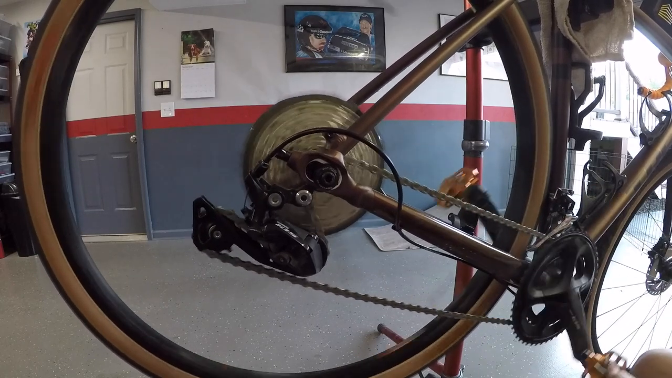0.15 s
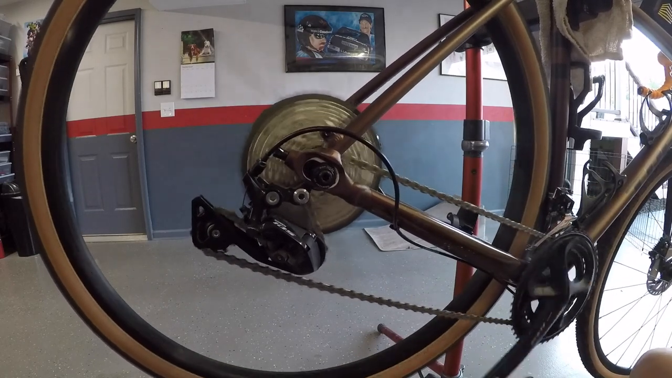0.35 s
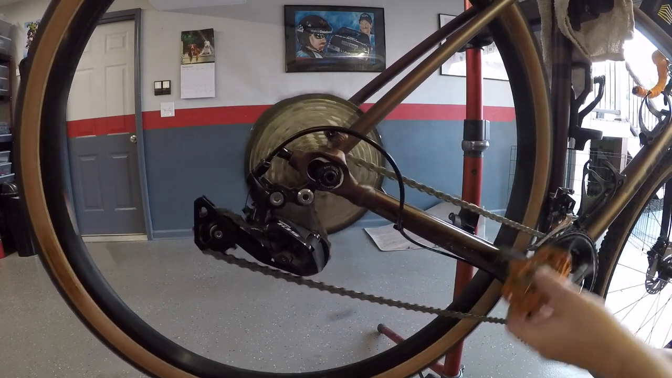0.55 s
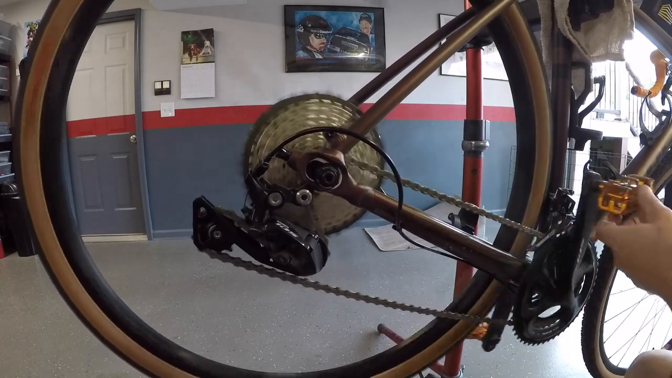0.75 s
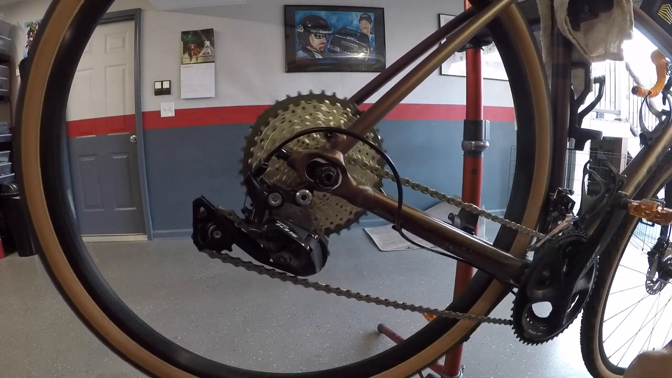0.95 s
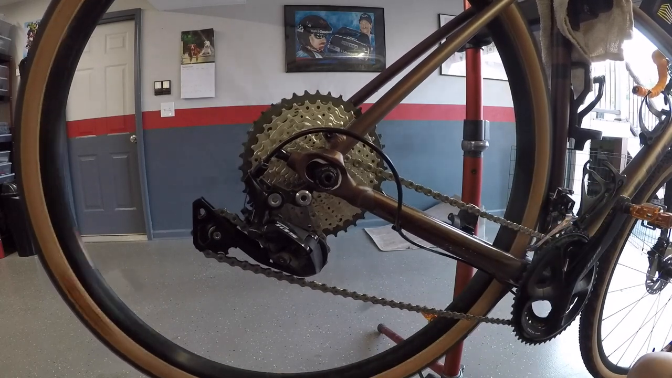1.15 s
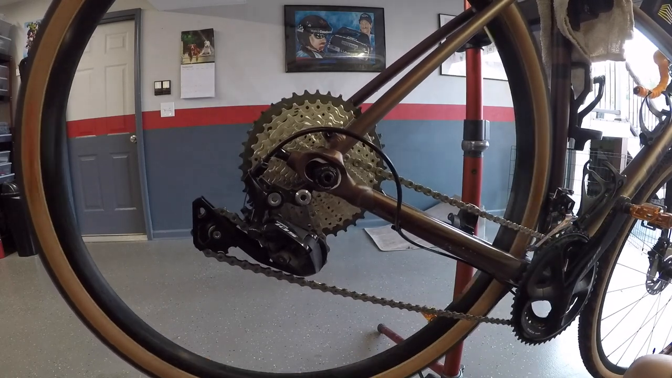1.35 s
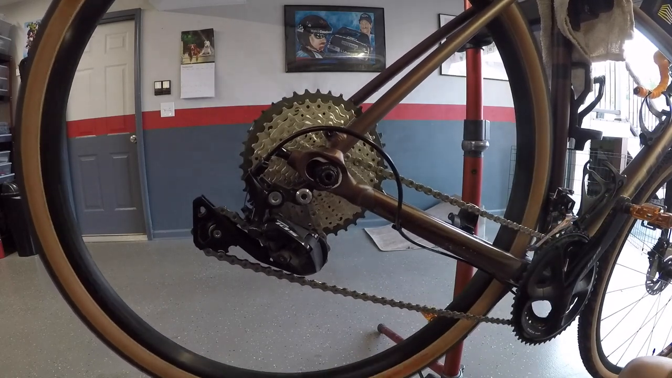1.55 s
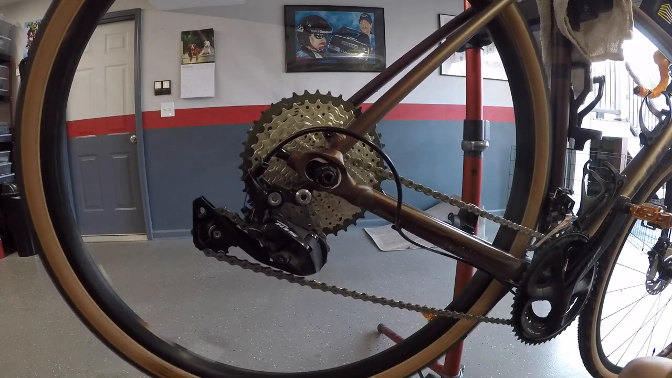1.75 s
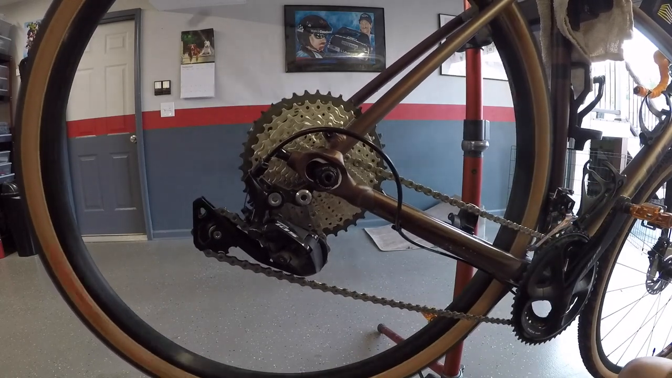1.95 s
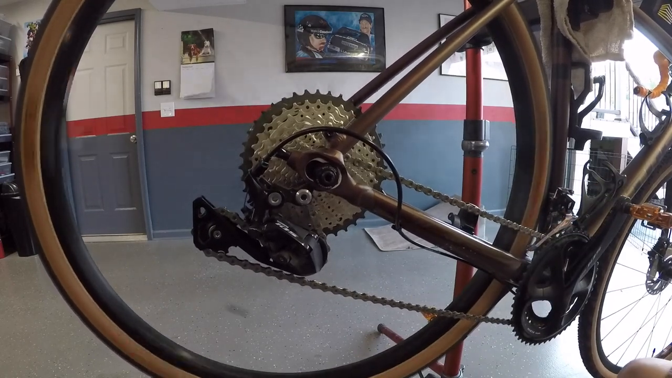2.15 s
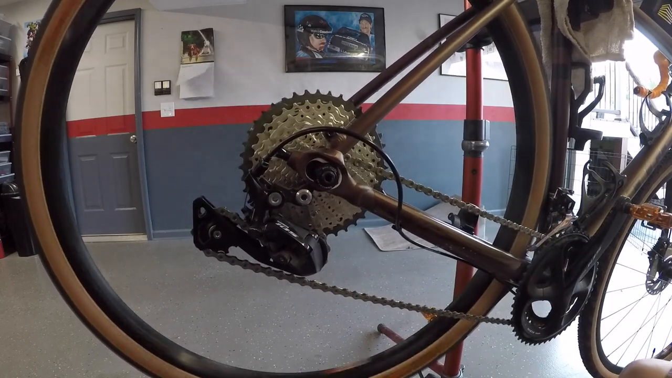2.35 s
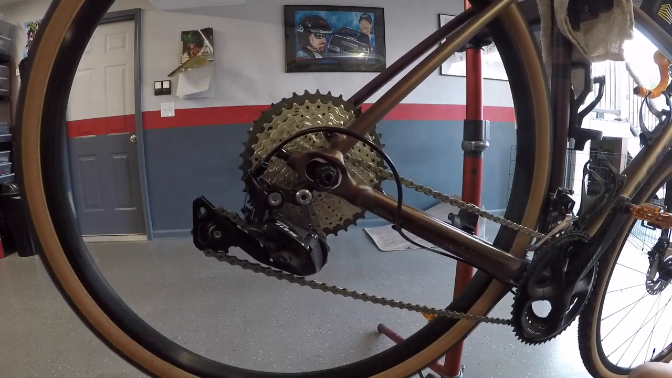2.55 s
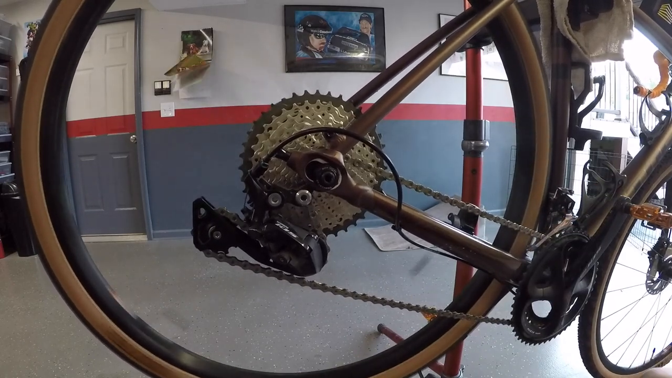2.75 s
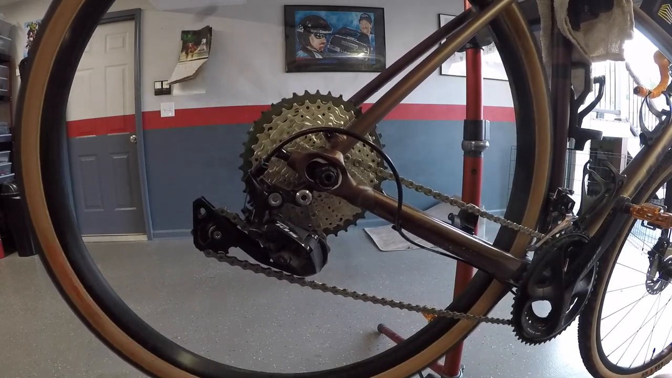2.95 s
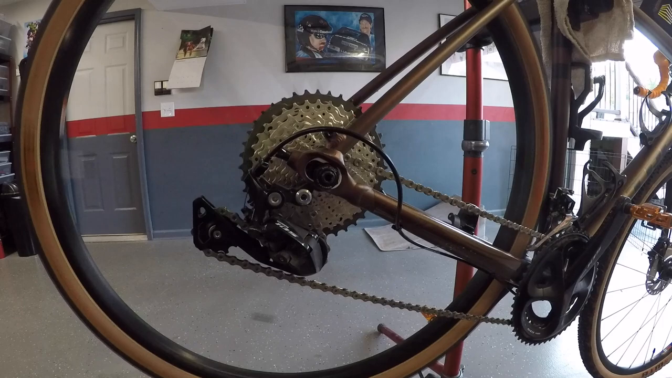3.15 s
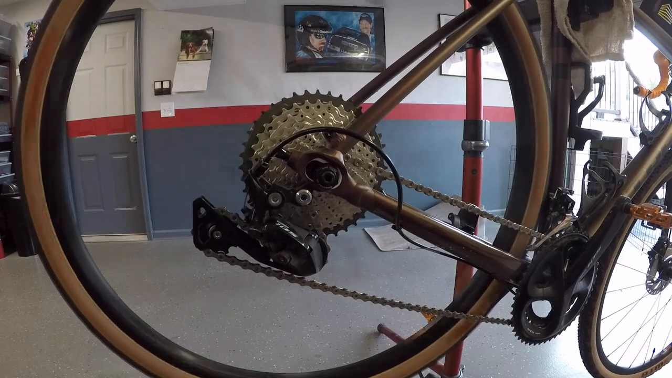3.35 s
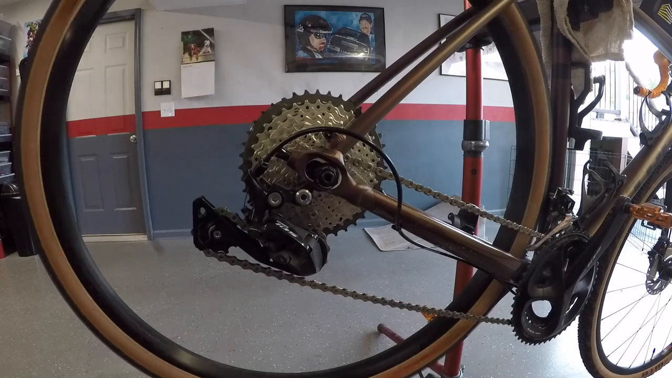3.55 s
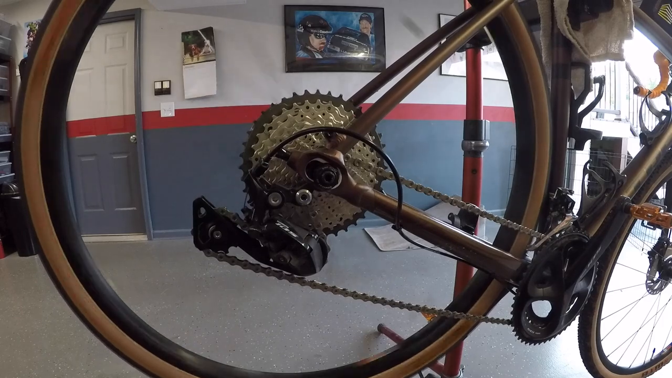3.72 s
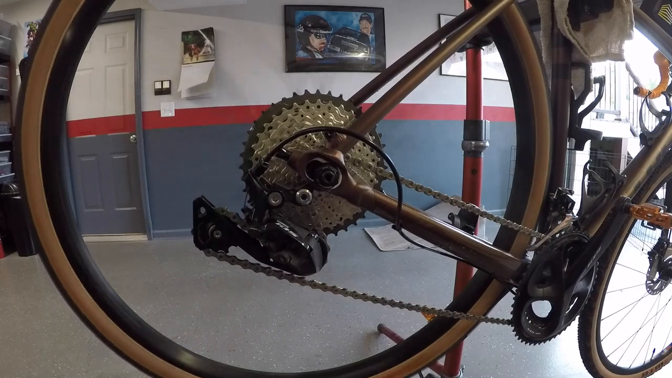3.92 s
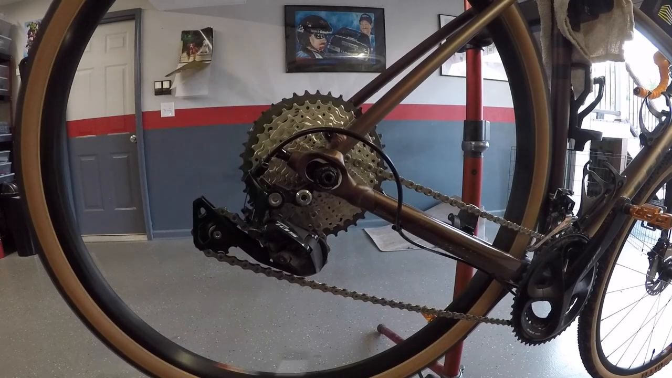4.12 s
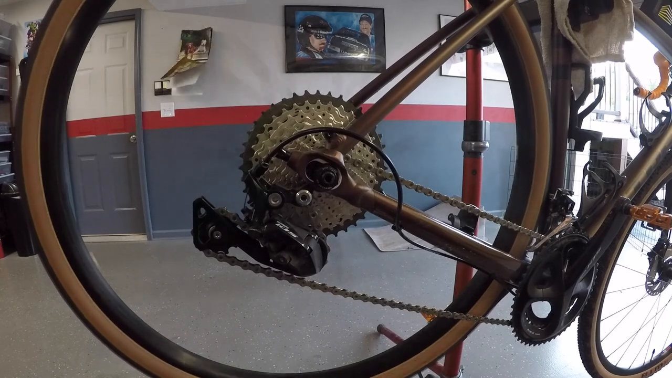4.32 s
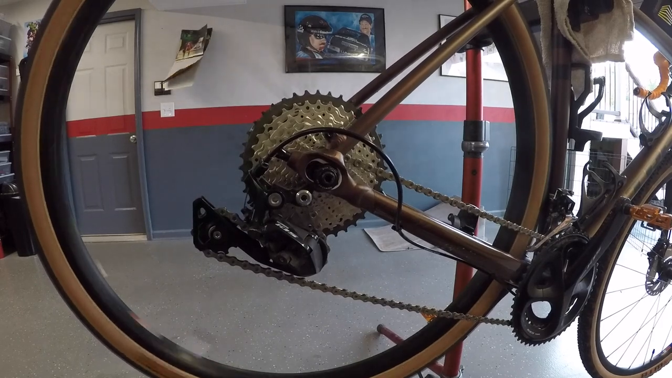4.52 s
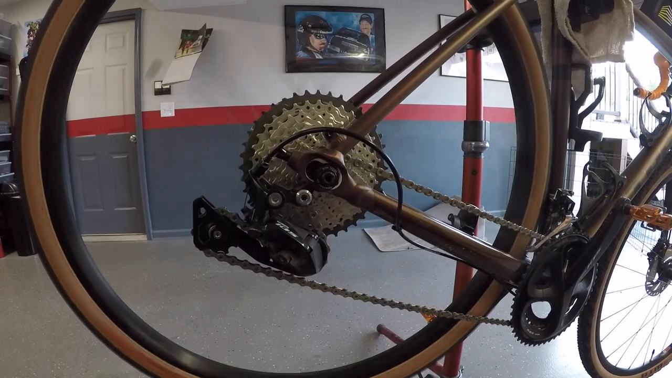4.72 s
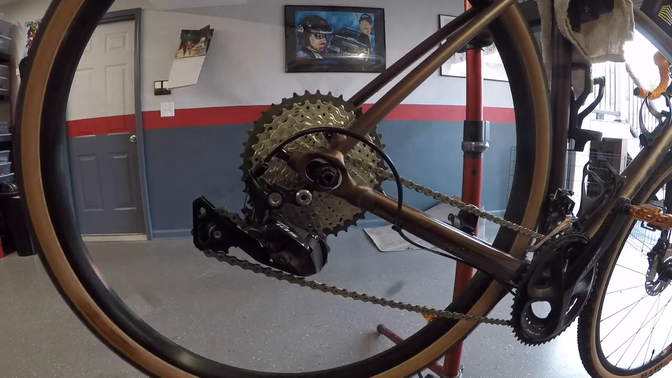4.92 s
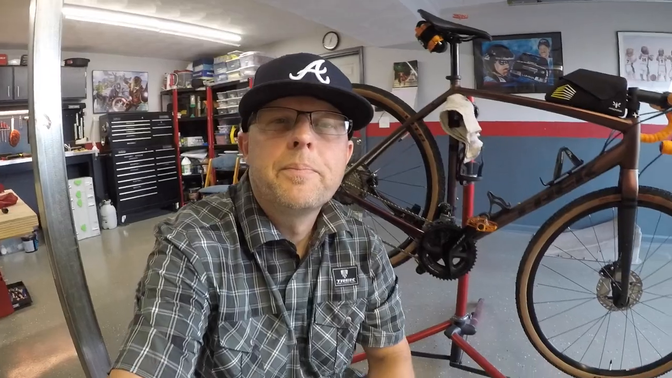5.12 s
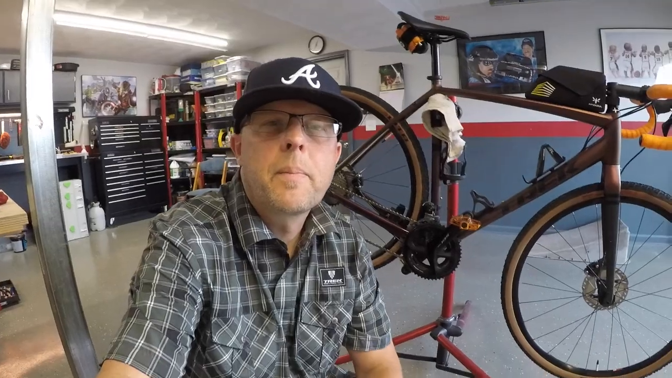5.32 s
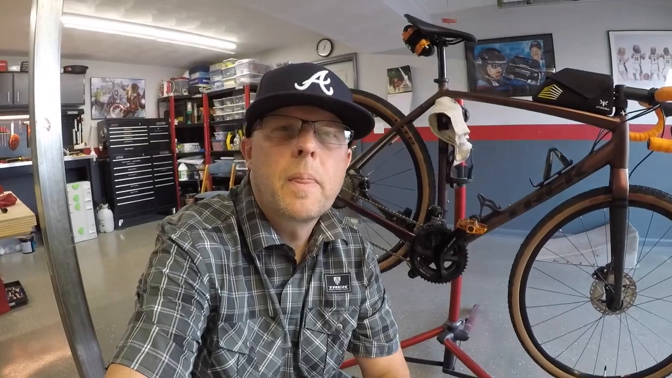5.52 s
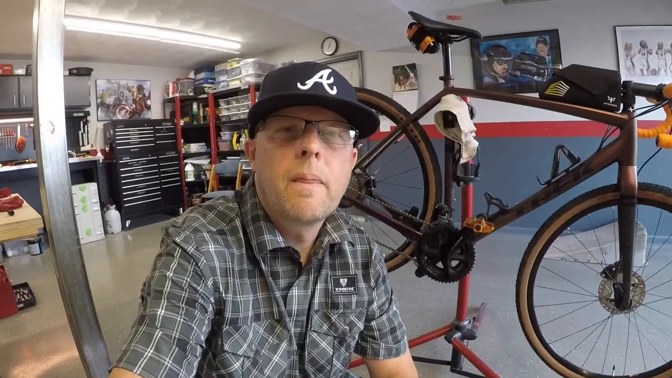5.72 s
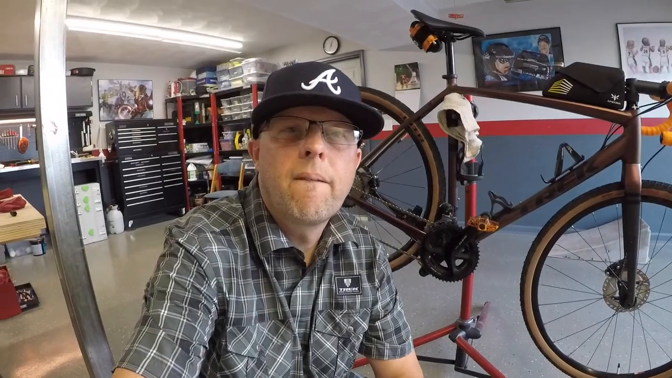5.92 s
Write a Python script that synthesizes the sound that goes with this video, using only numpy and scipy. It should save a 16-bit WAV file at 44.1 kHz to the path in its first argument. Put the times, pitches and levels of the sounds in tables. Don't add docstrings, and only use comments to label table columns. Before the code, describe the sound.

A loud ratcheting freehub buzz follows a short run of chain ticks in a garage, with low thumps, then sudden near silence.

```python
import sys
import numpy as np
from scipy import signal
from scipy.fft import rfft, irfft, next_fast_len
from scipy.io import wavfile
from scipy.ndimage import uniform_filter1d

SR = 44100
rng = np.random.default_rng(int(sys.argv[2]) if len(sys.argv) > 2 else 0)


def gain_from_decibels(decibels):
    exponent = np.asarray(decibels, float) / 20
    return 10 ** exponent


def materialize(psi):
    bounded = np.clip(np.atleast_2d(psi).T, -1, 1)
    quanta = np.round(bounded * 32767).astype(np.int16)
    wavfile.write(sys.argv[1], SR, quanta)


N = 263491
TIME = np.arange(N) / SR

RING_TEETH = 21
TOOTH_REPEAT = .7

# time in seconds, level in dB.
SPRING_FORCE = [(.67, -31.5), (.85, -33), (1.1, -32.5), (5, -32)]
# frequency in Hz, width in Hz, level in dB.
HUB_MODES = [(1920, 30, -6), (2230, 110, -4), (2630, 70, -5), (3140, 62, -4), (3450, 34, -2),
             (4160, 49, -4), (4580, 280, 0), (5600, 60, -2), (6280, 34, -8), (6450, 140, -9),
             (6720, 26, -10), (6900, 66, -10), (7800, 110, -13), (8060, 250, -7), (8650, 390, -8),
             (10000, 64, -4), (11000, 89, -2), (11400, 48, -5), (12200, 120, -6), (13400, 170, -5),
             (14400, 160, -6)]
# frequency in Hz, level in dB.
SPOKE_MODES = [(1916, -59.5), (2207, -59), (2439, -59), (3456, -55), (4177, -59), (4727, -55), (5599, -57),
               (6282, -62), (6724, -62), (7800, -66), (8064, -60), (8667, -62), (10002, -58), (11041, -57),
               (12258, -61), (13361, -59)]
# frequency in Hz, density in dB per Hz.
CRACK_COLOUR = [(470, -63), (800, -13), (1020, -31), (1120, -17), (1380, -17), (2220, -6.5), (2950, -3),
                (3640, -2.5), (4600, -1.5), (5020, -12.5), (5470, -9), (7350, -11.5), (8310, -7),
                (9290, -1), (11000, -9.5), (15200, -5)]
# frequency in Hz, width in Hz, level in dB.
PAWL_MODES = [(1690, 490, -14), (4740, 430, 3), (5420, 310, 4.5), (8930, 520, -8.5), (11080, 1300, 2.5),
              (12530, 1100, -1.5), (14300, 1090, -2)]
# frequency in Hz, width in Hz, depth from 0 to 1.
CANCEL_DIPS = [(8160, 110, 1), (9310, 460, 1), (12800, 540, 0.3)]
# delay in seconds, level in dB.
NEAR_ECHOES = [(.0035, -8), (.0085, -10), (.0147, -13)]
# frequency in Hz, density in dB per Hz.
RATTLE_COLOUR = [(180, -34), (300, -4), (354, 3), (431, -1), (995, -3.5), (1080, 1.5), (1480, -0.5),
                 (4220, -3), (7260, -11), (11500, -9.5), (15200, -22.5)]
# time in seconds, peak in dB, low metal share in dB.
LAST_LINKS = [
    (0.591, -33.5, -5),
    (0.602, -33, -16),
    (0.6313, -28.5, -18),
    (0.6674, -35.5, -20),
]
# time in seconds, peak in dB, ring in Hz, t60 in seconds, thud in dB.
KNOCKS = [
    (0.219, -37, 632, 0.045, -23),
    (0.721, -33.5, 1100, 0.063, -32),
    (3.167, -38, 195, 0.17, -9),
    (3.884, -34, 244, 0.1, 7),
    (3.997, -27, 242, 0.14, 4.5),
    (4.094, -36, 255, 0.12, -19),
    (4.145, -45.5, 249, 0.17, -9),
    (5.251, -48, 167, 0.093, -6),
]
# time in seconds, peak in dB, rise in seconds, fall in seconds.
HANDLING = [
    (3.22, -40, .1, .25),
    (3.65, -50, 0.072, .15),
    (3.9, -41.5, 0.47, 0.12),
    (4.009, -33.5, 0.16, 0.19),
    (4.25, -46.5, 0.11, 0.13),
    (4.62, -42.5, 0.38, 0.41),
    (5.0, -48, 0.42, .1),
    (5.11, -40.5, 0.058, 0.61),
]
# frequency in Hz, level in dB.
HUM_TONES = [(104, -70), (129.2, -70.5), (208.5, -67.5), (312.2, -82)]
# frequency in Hz, density in dB per Hz.
GARAGE_COLOUR = [(35, -46), (60, -5), (114, 8), (176, -9.5), (200, 0), (280, -4), (306, -4), (934, -11.5),
                 (1200, -10.5), (1560, -57), (2640, -120)]
# frequency in Hz, density in dB per Hz.
QUIET_COLOUR = [(47, -39), (80, -8), (114, -14), (145, -23), (510, -20), (1570, -21.5), (2180, -28.5),
                (4500, -32), (5600, -36.5), (15500, -44)]
# start in seconds, end in seconds, frequency in Hz, level in dB.
SQUEAK = (5.42, 5.54, 2980, -77)
# time in seconds, gain in dB.
FADE_OUT = [(4.99, 0), (5.007, -1), (5.0085, -46), (5.0255, -42), (5.027, -90)]
# time in seconds, gain in dB.
FADE_IN = [(5.05, -70), (5.056, -30), (5.064, -3), (5.075, 0)]
# frequency in Hz, gain in dB.
TOP_END = [(15250, 0), (15330, -11), (15820, -24), (15880, -75), (20000, -75)]


def curve(table):
    return np.interp(TIME, *np.transpose(table))


def noise():
    return rng.standard_normal(N)


def level(x, db):
    return x * gain_from_decibels(db) / np.sqrt(np.mean(x ** 2))


def shape(table, hz):
    points_hz, points_db = np.transpose(table)
    return np.interp(np.log(hz), np.log(points_hz), points_db)


def colour(x, table):
    size = next_fast_len(N)
    hz = np.arange(1, size // 2 + 2) * SR / size
    return irfft(rfft(x, size) * gain_from_decibels(shape(table, hz)), size)[:N]


def ring(x, hz, width_hz):
    r = np.exp(-np.pi * width_hz / SR)
    poles = [1, -2 * r * np.cos(2 * np.pi * hz / SR), r * r]
    return (1 - r * r) / 2 * signal.lfilter([1, 0, -1], poles, x)


def fade(x, t60):
    return signal.lfilter([1], [1, -np.exp(-np.log(1000) / (t60 * SR))], x)


def spikes(s, gain):
    return np.bincount(np.clip((s * SR).astype(int), 0, N - 1), gain, N)


def walk(rate):
    hold = int(SR / rate)
    steps = np.repeat(rng.standard_normal(N // hold + 1), hold)
    return 1.3 * uniform_filter1d(uniform_filter1d(steps, hold), hold)[:N]


def slipped_teeth():
    wheel_teeth_per_s = 71.838 * (1 - .05289 * TIME + .00094 * TIME ** 2)
    brake_start_s, cogs_stop_s = .5257, 1.0038
    cogs = np.clip((cogs_stop_s - TIME) / (cogs_stop_s - brake_start_s), 0, 1) ** .9595
    silent_teeth = 1.647
    return np.cumsum(wheel_teeth_per_s * (1 - cogs)) / SR - silent_teeth


def worn(tooth):
    lasting = rng.standard_normal(RING_TEETH)[tooth % RING_TEETH]
    passing = rng.standard_normal(len(tooth))
    return np.sqrt(TOOTH_REPEAT) * lasting + np.sqrt(1 - TOOTH_REPEAT) * passing


def pawl_drops(tooth):
    lag_s = .0007
    first = np.interp(tooth, slipped_teeth(), TIME) + .00015 * worn(tooth)
    second = first + lag_s * np.abs(worn(tooth))
    third = first + 2.5 * lag_s * np.abs(worn(tooth))
    share = gain_from_decibels(np.array([2 * worn(tooth), 2.5 * worn(tooth) - 4, 2.5 * worn(tooth) - 7]))
    spring = gain_from_decibels(np.interp(first, *np.transpose(SPRING_FORCE)))
    force = share / np.sqrt(np.sum(share ** 2, axis=0)) * spring
    return np.concatenate([first, second, third]), force


def freehub():
    tooth = np.arange(262)
    drops, force = pawl_drops(tooth)
    first = drops[:len(tooth)]
    last = np.clip(np.searchsorted(first, TIME) - 1, 0, None)
    since = (np.arange(N) - (first[last] * SR).astype(int)) % 2048
    fresh = noise()

    def chatter(t60, tail=0.):
        blows = spikes(drops, (force * gain_from_decibels(worn(tooth))).ravel())
        swell = fade(blows, t60)
        if tail:
            swell = swell + tail * fade(blows, 5 * t60)
        swell = signal.lfilter([.08], [1, -.92], swell)
        own = rng.standard_normal((RING_TEETH, 2048))[last % RING_TEETH, since]
        passing = np.roll(fresh, rng.integers(N))
        return swell * (np.sqrt(TOOTH_REPEAT) * own + np.sqrt(1 - TOOTH_REPEAT) * passing)

    hub = sum(gain_from_decibels(db) * ring(chatter(.02), hz, .8 * width) for hz, width, db in HUB_MODES)
    spokes = sum(gain_from_decibels(db) * ring(chatter(.012), hz, 14 + .0015 * hz) for hz, db in SPOKE_MODES)
    crack = np.zeros(N)
    for k in range(13):
        hz = 1000 * 2 ** (k / 3)
        band = ring(chatter(.02 * (hz / 4000) ** -.2, tail=.32), hz, hz / 4)
        crack += level(band, k)
    crack = colour(crack, CRACK_COLOUR)
    ping = sum(gain_from_decibels(db) * ring(chatter(.0095), hz, width) for hz, width, db in PAWL_MODES)

    direct = level(crack, -5) + level(hub, -9.5) + level(spokes, -11.5) + level(ping, -5.5)
    for hz, width_hz, depth in CANCEL_DIPS:
        direct = direct - depth * ring(direct, hz, width_hz)
    dull = ring(ring(direct, 2300, 2200), 2300, 2100)
    near = sum(gain_from_decibels(db) * np.roll(dull, int(delay * SR)) for delay, db in NEAR_ECHOES)
    return level(direct + near + garage_echo(direct, -6.5), -32.5)


def links():
    link = np.arange(21)
    chance = rng.standard_normal((6, len(link)))
    first_s, period_s, outer_late_s, touch_early_s = .0241, .02738, .0019, .0098
    seat = first_s + link * period_s + outer_late_s * (link % 2) + .0004 * chance[0]
    seats = [seat, -35 + 1.2 * chance[1], -13 + 2 * chance[2]]  # s, peak dB, low share dB
    touch = seat - touch_early_s + .0008 * chance[3]
    touches = [touch, -40 + 2 * chance[4], -7 + 2 * chance[5]]
    return np.hstack([seats, touches, np.transpose(LAST_LINKS)])


def chain():
    s, peak_db, low_db = links()
    tick = fade(spikes(s, gain_from_decibels(peak_db + .5)), .016) * noise()
    tick = ring(ring(tick, 9900, 6800), 10700, 5000) + .49 * ring(tick, 12000, 2500)
    clank = fade(spikes(s, gain_from_decibels(peak_db + low_db + 10)), .045) * noise()
    clank = ring(ring(clank, 2900, 2900), 4400, 3500)
    rattle = level(colour(noise(), RATTLE_COLOUR) * gain_from_decibels(walk(91.7)), -50.7)
    settling = gain_from_decibels(-30 * np.clip(TIME - .67, 0, None))
    return tick + clank + garage_echo(tick + clank, -13) + rattle * settling


def garage_echo(x, wet_db):
    t60, build_s, dull_hz = .41, .0051, 5000
    s = np.arange(int(.5 * SR)) / SR
    tails = rng.standard_normal((3, len(s))) * gain_from_decibels(-60 * s / t60) * np.minimum(s / build_s, 1)
    tails = signal.lfilter(*signal.butter(1, dull_hz, fs=SR), tails)
    wet = sum(signal.fftconvolve(x * walk(40), tail)[:N] for tail in tails)
    return gain_from_decibels(wet_db) * wet / np.sqrt(np.sum(tails ** 2))


def knocks():
    out = np.zeros(N)
    age = TIME[:SR // 2]
    partials = ((1, .96), (.524, .73), (.88, .38), (1.14, .13))
    for s, peak_db, hz, t60, thud_db in KNOCKS:
        body = sum(gain * np.sin(2 * np.pi * ratio * hz * age) for ratio, gain in partials)
        body = body * gain_from_decibels(-60 * age / t60)
        thud = gain_from_decibels(thud_db) * np.sin(2 * np.pi * 58 * age) * gain_from_decibels(-60 * age / .22)
        attack = np.minimum(age / .0036, 1)
        out[int(s * SR):][:SR // 2] += gain_from_decibels(peak_db - 3.5) * attack * (body + thud)
    s, peak_db = np.transpose(KNOCKS)[:2]
    scuff = ring(ring(noise(), 450, 560), 450, 540)
    return out + fade(spikes(s, gain_from_decibels(peak_db)), .051) * scuff


def rumble(calm_db):
    spectrum = [(2, -27), (8, 10), (25, -9), (50, -6.5), (90, -21), (200, -26.5), (900, -65.5)]  # Hz, dB
    swing = colour(noise(), spectrum)
    power = gain_from_decibels(2 * calm_db)
    for s, db, rise_s, fall_s in HANDLING:
        distance = np.maximum((s - TIME) / rise_s, (TIME - s) / fall_s)
        power = power + gain_from_decibels(2 * (db - 20 * distance))
    return level(swing, 0) * np.sqrt(power)


def garage():
    hum = np.zeros(N)
    for hz, db in HUM_TONES:
        phase = 2 * np.pi * np.cumsum(hz + .7 * walk(4)) / SR
        hum += gain_from_decibels(db + 3 + 1.4 * walk(3)) * np.sin(phase)
    return hum + level(colour(noise(), GARAGE_COLOUR) * gain_from_decibels(walk(12)), -60)


def quiet_room():
    return level(colour(noise(), QUIET_COLOUR) * gain_from_decibels(.67 * walk(17)), -63)


def squeak():
    start, end, hz, db = SQUEAK
    swell = np.sin(np.pi * np.clip((TIME - start) / (end - start), 0, 1))
    return level(ring(noise(), hz, 40), db) * swell


def scene():
    close = freehub() + chain() + garage() + rumble(calm_db=-59)
    wide = quiet_room() + rumble(calm_db=-46.5) + squeak()
    bumps = knocks()
    before = (close + bumps) * gain_from_decibels(curve(FADE_OUT))
    after = (wide + bumps) * gain_from_decibels(curve(FADE_IN))
    return (before + after)[None]


def roll_off(x):
    return signal.sosfilt(signal.butter(12, 16480, fs=SR, output="sos"), x)


def record(dry):
    mix = colour(dry[0], TOP_END)[None]
    return roll_off(mix)


dry = scene()
out = record(dry)
materialize(out)
```